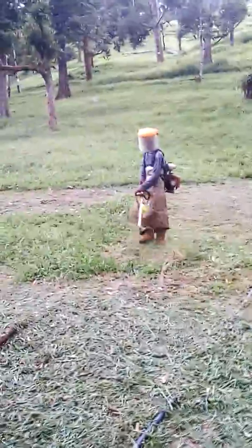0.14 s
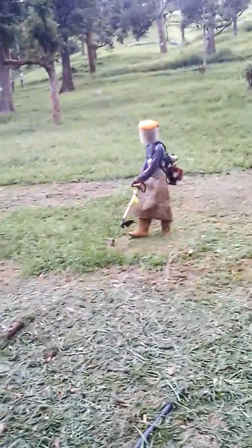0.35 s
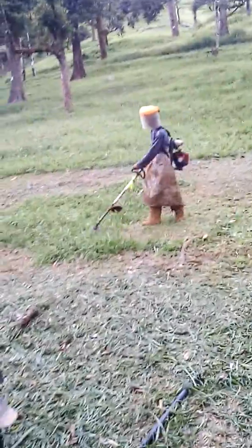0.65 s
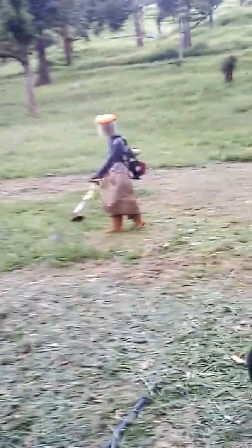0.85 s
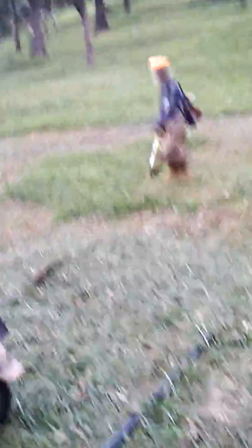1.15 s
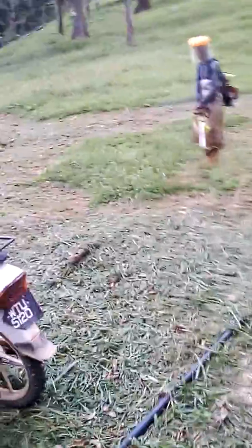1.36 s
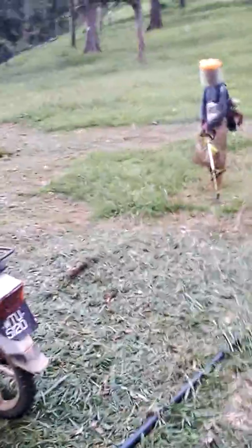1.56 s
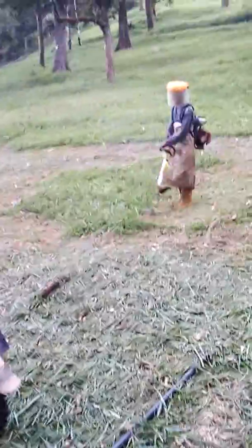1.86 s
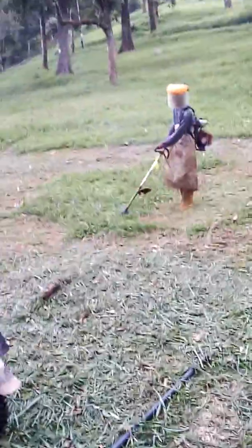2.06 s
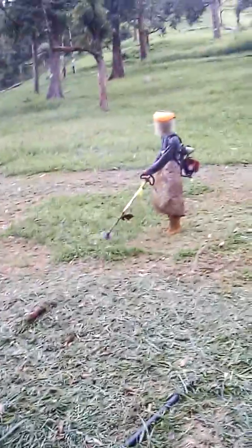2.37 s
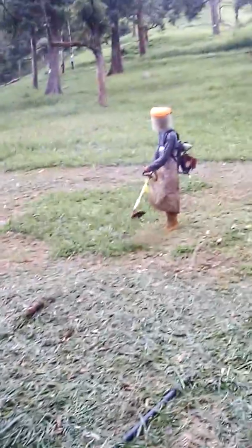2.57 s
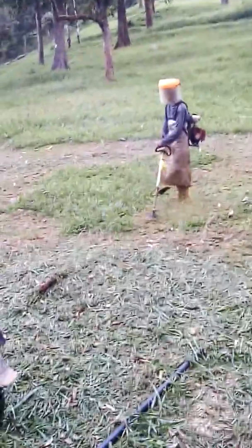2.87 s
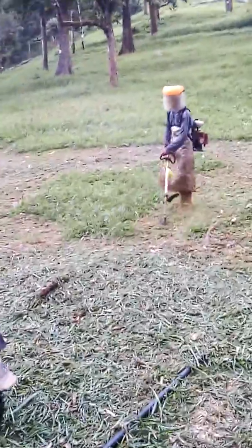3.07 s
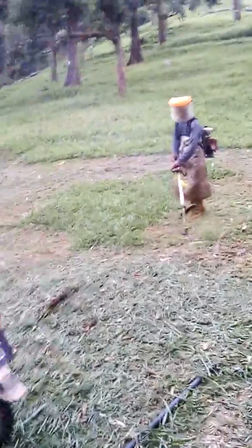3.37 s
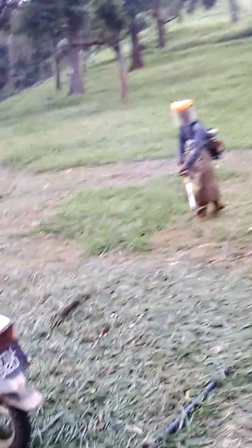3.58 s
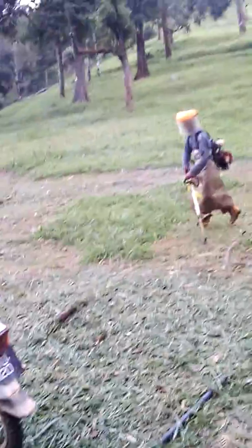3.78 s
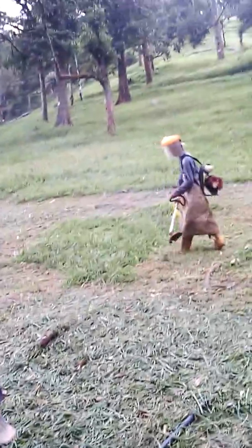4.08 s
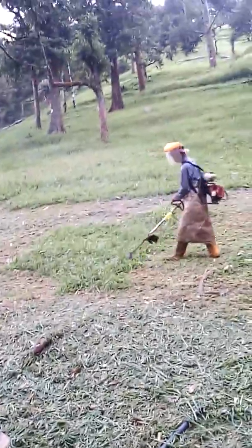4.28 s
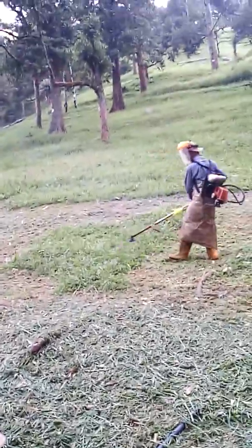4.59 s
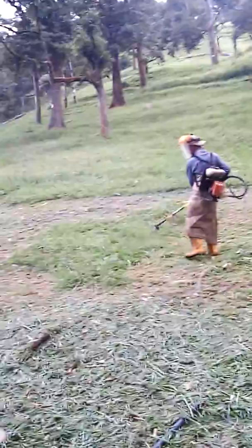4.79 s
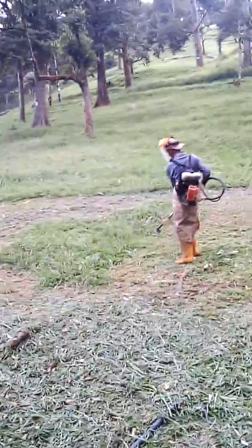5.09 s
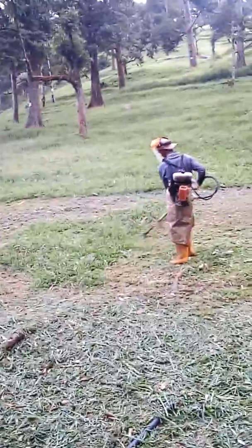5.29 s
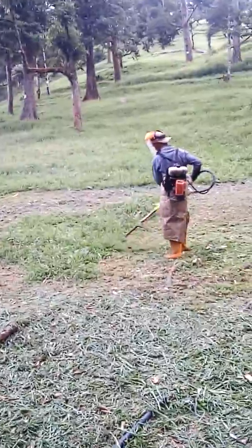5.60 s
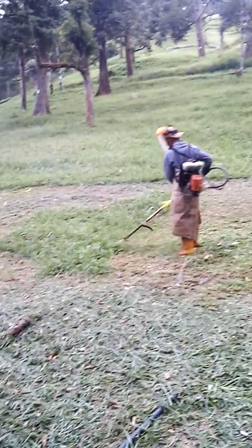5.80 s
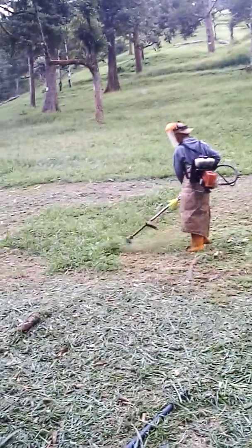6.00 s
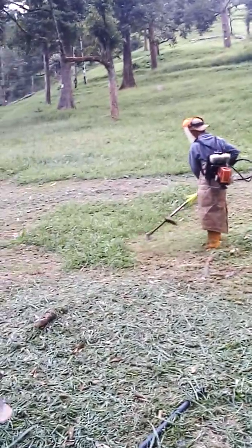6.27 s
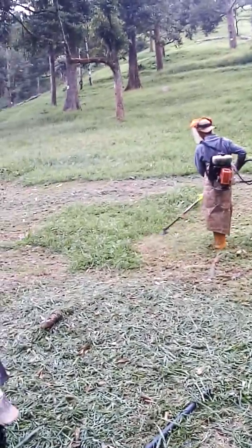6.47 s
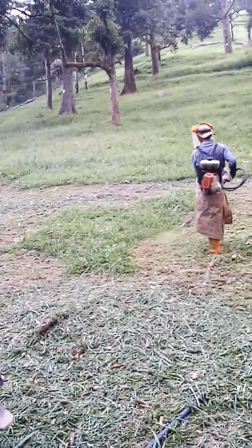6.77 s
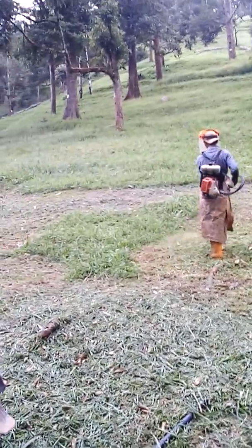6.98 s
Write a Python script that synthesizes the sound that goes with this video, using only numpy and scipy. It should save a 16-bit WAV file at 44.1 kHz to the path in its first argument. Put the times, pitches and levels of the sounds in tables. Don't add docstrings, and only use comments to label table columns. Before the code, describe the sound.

A small two-stroke brush cutter drones steadily outdoors while its spinning line swishes, slaps grass stalks and cracks sharply on stems and soil.

```python
import sys
import numpy as np
from scipy import signal
from scipy.fft import rfft, irfft
from scipy.io import wavfile
from scipy.ndimage import uniform_filter1d, map_coordinates

SR = 44100
rng = np.random.default_rng(int(sys.argv[2]) if len(sys.argv) > 2 else 0)


def undo_db(level):
    steps = np.asarray(level, float) / 20
    return 10 ** steps


def master(y):
    cut = np.clip(np.atleast_2d(y).T, -1, 1)
    pcm = np.round(cut * 32767)
    wavfile.write(sys.argv[1], SR, pcm.astype(np.int16))


N = 314874


def unit(x):
    return x / np.sqrt(np.mean(x ** 2) + 1e-20)


def curves(rows):
    s, *cols = np.transpose(rows)
    return [np.interp(np.arange(N) / SR, s, c) for c in cols]


def wobble(rate_hz, count=1):
    knots = rng.standard_normal(int(N * rate_hz / SR) + 4)
    return map_coordinates(knots, [np.arange(0, N, count) * rate_hz / SR])


def coloured(x, spectrum):
    hz, db = np.transpose(spectrum)
    size = 4096
    bins_hz = np.fft.rfftfreq(size, 1 / SR)
    gain = undo_db(np.interp(np.log(bins_hz + 1), np.log(hz), db))
    cepstrum = irfft(np.log(gain + 1e-5))
    cepstrum[1:size // 2] *= 2
    cepstrum[size // 2 + 1:] = 0
    return signal.oaconvolve(x, irfft(np.exp(rfft(cepstrum))))[:N]


def patchy(patchy_db):
    z = signal.stft(rng.standard_normal(N), nperseg=512)[2]
    field = uniform_filter1d(rng.standard_normal(z.shape), 5, 0)
    field = uniform_filter1d(field, 20, 1)
    return unit(signal.istft(z * undo_db(patchy_db * unit(field)), nperseg=512)[1][:N])


def burst(sizes, decay_s):
    shape = np.exp(-np.arange(SR // 100) / SR / decay_s)
    puff = signal.oaconvolve(abs(sizes), shape)[:N] * rng.standard_normal(N)
    return sizes + 0.45 * puff


def knocks(at, sizes, hz, decay_s):
    t = np.arange(SR // 100) / SR
    envelope = t / decay_s * np.exp(1 - t / decay_s)
    tones = sizes[:, None] * np.sin(2 * np.pi * hz[:, None] * t) * envelope
    places = at[:, None] + np.arange(len(t))
    return np.bincount(places.ravel(), tones.ravel(), N + len(t))[:N]


# start_s, side (0 hidden, 1 side-on, 2 facing
BACKPACK_TURN = [
    (0, 0),
    (.9, 0.12),
    (1.8, 1),
    (4.35, 1.3),
    (4.8, 2.4),
    (7.14, 2.8),
]


def backpack_turn():
    return curves(BACKPACK_TURN)[0]


def turned(x, spectra):
    turn = np.clip(backpack_turn(), 0, len(spectra) - 1)
    sound = 0
    for i, side in enumerate(spectra):
        share = np.clip(1 - abs(turn - i), 0, 1)
        sound = sound + np.sqrt(share) * unit(coloured(x, side))
    return sound


# start_s, lag_ms, cutter_strength_0_to_1
GROUND_ECHO = [(0, 0.55, 0.25), (.45, 0.58, 0.1), (.65, 0.62, 0.2), (.9, 0.67, 0.14), (1.2, 1.03, 0.04),
               (1.45, 1.02, 0.03), (1.7, 1.08, 0.06), (2.1, 1.3, 0.13), (4, 1.22, 0.12), (7.14, 1.19, 0)]


def grounded(x, strength):
    lag_ms = uniform_filter1d(curves(GROUND_ECHO)[0], SR // 10)
    copy = map_coordinates(x, [np.arange(N) - lag_ms * SR / 1000], order=2)
    return (x + strength * copy) / np.sqrt(1 + strength ** 2)


# start_s, level_db
EXHAUST_LEVEL = [(0.0, -38), (1.19, -32.5), (1.81, -35), (3.7, -35.5), (4.34, -33), (4.55, -34.5),
                 (4.73, -31.5), (5.55, -34), (7.14, -33)]
# start_s, firings_hz
FIRING_RATE = [(0.0, 88.1), (1.79, 88.0), (2.48, 88.3), (3.02, 87.9), (3.32, 88.6), (3.5, 87.6),
               (4.06, 87.5), (4.34, 92.6), (4.57, 94.9), (4.71, 95.3), (5.09, 89.5), (5.31, 88.2),
               (7.08, 88.2), (7.14, 87.7)]
# multiple_of_firing_rate, level_db
OVERTONES_HIDDEN = [(1, -23.5), (2, -20), (3, -20.5), (4, -17.5), (5, -19.5), (6, -7.5), (7, -36), (8, -52),
                    (9, -1), (10, 6.5), (11, 1.5), (12, 1.5), (13, -15), (14, -7), (15, -26), (16, -18),
                    (17, -10), (18, -8), (19, -33), (20, -15)]
OVERTONES_SIDE_ON = [(1, -25), (2, -22.5), (3, -20.5), (4, -42), (5, -24), (6, -17.5), (7, -39), (8, -5.5),
                     (9, -2.5), (10, 4.5), (11, -3), (12, -5), (13, -30), (14, -12.5), (15, -16), (16, -40),
                     (17, -45), (18, -12), (19, -21), (20, -11), (21, -24), (22, -30), (23, -15), (24, -19),
                     (25, -18), (26, -17), (27, -14), (28, -29), (29, -21), (30, -32)]
OVERTONES_FACING = [(1, -24.5), (2, -22.5), (3, -18.5), (4, -47), (5, -22.5), (6, -9.5), (7, -3), (8, -9.5),
                    (9, -2), (10, 5), (11, -8.5), (12, -6.5), (13, -16.5), (14, -53), (15, -19),
                    (16, -11.5), (17, -10.5), (18, -25), (19, -7.5), (20, -28), (21, -32), (22, -36),
                    (23, -44), (24, -13), (25, -19), (26, -36), (27, -8), (28, -9), (29, -13), (30, -21)]
# pitch_hz, width_hz, level_db
FIN_RESONANCE = (4850, 110, -14.5)
# freq_hz, level_db_per_hz
CASING_SPECTRUM = [(40, -40), (70, -44), (100, -29), (300, -11), (500, -8), (900, -2), (1200, -4.5),
                   (1600, -9.5), (2400, -6), (4000, -12.5), (8000, -73)]


def engine():
    level_db, = curves(EXHAUST_LEVEL)
    rate_hz, = curves(FIRING_RATE)
    over_hz = rate_hz - np.median(rate_hz)
    cycles = np.cumsum(rate_hz * (1 + 0.0011 * wobble(25))) / SR
    note = exhaust_note(cycles, rate_hz, over_hz)
    gate = 1 + .5 * np.cos(2 * np.pi * cycles)
    casing = unit(coloured(gate * patchy(patchy_db=-2), CASING_SPECTRUM))
    casing_db = -42 - 0.46 * over_hz + 3 * np.clip(backpack_turn() - 2, 0, 1)
    return undo_db(level_db + 1.0) * note + undo_db(casing_db) * grounded(casing, 0.39)


def exhaust_note(cycles, rate_hz, over_hz):
    race_hz, fill_db = 5, -17
    step = 64
    coarse = np.arange(0, N, step)
    turn, rate, over = backpack_turn()[coarse], rate_hz[coarse], over_hz[coarse]
    angle = (2 * np.pi * (cycles % 1)).astype(np.float32)
    fin_hz, fin_width_hz, fin_db = FIN_RESONANCE
    note, power = np.zeros(N), 0
    for k in (*range(1, 32), *range(51, 60)):
        place = k * (rate / np.median(rate_hz)) ** (k > 13)
        gain = 0
        for i, side in enumerate((OVERTONES_HIDDEN, OVERTONES_SIDE_ON, OVERTONES_FACING)):
            side_db = np.interp(place, *np.transpose(side), right=-45)
            gain = gain + np.clip(1 - abs(turn - i), 0, 1) * undo_db(side_db)
        fins = undo_db(fin_db) / (1 + ((k * rate - fin_hz) / fin_width_hz) ** 2)
        gain = gain + np.clip(turn - 1, 0, 1) * fins
        fill = (4 < k < 15) * undo_db(fill_db) * np.clip(over / race_hz, 0, 1)
        gain = np.maximum(gain, fill)
        power = power + gain ** 2 / 2
        gain = gain * undo_db(wobble(4.6, count=step))
        lag = 1.51 * np.arctan((k - 10) / 0.5)
        note += np.interp(np.arange(N), coarse, gain) * np.cos(k * angle - np.float32(lag))
    return note / np.interp(np.arange(N), coarse, np.sqrt(power))


# start_s, turns_hz
HEAD_SPEED = [(0.0, 52.31), (0.24, 62.31), (1.18, 64.14), (1.28, 53.48), (1.52, 51.5), (1.96, 61.72),
              (2.28, 56.22), (2.52, 66.56), (2.8, 59.09), (3.32, 67.06), (3.78, 57.96), (4.48, 72.99),
              (5.18, 67.66), (5.38, 60.4), (5.76, 59.93), (6.14, 50.96), (6.36, 58.6), (7.14, 67.85)]


def head_turns():
    return np.cumsum(curves(HEAD_SPEED)[0]) / SR - .04


def line_hum(turns):
    level = undo_db(-62.5 + 2.7 * wobble(4.02))
    return level * (np.cos(4 * np.pi * turns) + 0.17 * np.cos(8 * np.pi * turns))


def line_swish(passes, luck, end_db):
    swell = undo_db(3.24 * luck[:, 0] + 0.79 * end_db) * np.exp(-2.5 * (passes % 1))
    return unit(1.73 + unit(swell)) * undo_db(0.27 * wobble(12))


def stalk_slaps(starts, luck, end_db, lopsided_db):
    run_db, scatter_db = 2.5, 3.5
    stem_hidden_hz, stem_hz = 2180, 3040
    late = (.0004 * SR * luck[:, 1]).astype(int)
    at = np.clip(starts + late, 0, N - 1)
    scatter = np.clip(luck[:, 2], -3, .8)
    sizes = undo_db(run_db * wobble(7)[starts] + scatter_db * scatter + end_db)
    sizes = sizes / np.cosh(lopsided_db / 15) ** .5
    gap_s = abs(at[:, None] / SR - np.transpose(HARD_STRIKES)[0]).min(axis=1)
    sizes = sizes * (gap_s > .005)
    blows = np.zeros(N)
    blows[at] = sizes
    slaps = burst(blows, decay_s=0.0013)
    pitch_hz = np.interp(backpack_turn()[at], [0, .3], [stem_hidden_hz, stem_hz])
    pitch_hz = pitch_hz * np.exp(0.24 * luck[:, 3])
    return slaps, knocks(at, sizes, pitch_hz, decay_s=0.00024)


# start_s, swish_db, depth_db (slap over swish)
CUTTING = [(0.1, -26.5, -10.5), (.34, -22.5, -9), (.43, -23.5, -11), (.67, -21, -10), (.79, -22, -14.5),
           (1.09, -21.5, -7), (1.41, -30.5, -6.5), (2.09, -24, -9), (2.46, -22, -10.5), (2.88, -25, -8.5),
           (3.28, -25, -8), (3.98, -27.5, -6), (4.1, -27, -13.5), (4.61, -20, -20), (5.06, -17.5, -14),
           (5.37, -23, -11.5), (6.7, -24, -10.5), (7.14, -26.5, -18)]
# start_s, first_over_second_db
END_IMBALANCE = [(0, 12), (1, 9), (4.05, 10.5), (4.25, 4.5), (4.85, -14.5), (5, 7), (5.6, 9), (6.3, 6.5),
                 (7.14, 10)]
# freq_hz, level_db_per_hz
SWISH_SPECTRA = [
    [(2060, -46.5), (3500, -20.5), (3710, -20), (4090, -4.5), (4400, -4), (5390, 4.5), (5880, 4.5),
     (7000, -27), (9100, -59), (15400, -120)],
    [(2060, -37), (3500, -23.5), (3990, -6.5), (4430, -10.5), (5390, 5.5), (5580, -0.5), (5990, -0.5),
     (7000, -18), (9100, -35), (15400, -120)],
    [(2060, -39), (3500, -15.5), (4470, -8), (4600, -7), (5120, 2.5), (5450, -1.5), (6200, -0.5),
     (7000, -17.5), (9100, -42.5), (15400, -120)],
]
STALK_SPECTRA = [
    [(680, -33), (1150, -20), (1560, -17), (2090, -18), (2360, -23), (2840, -20.5), (3730, -10.5),
     (4600, -7.5), (5980, -39), (10100, -120)],
    [(680, -52), (1150, -10), (1480, -16.5), (1630, -6), (1900, -14), (2440, -5), (2780, -5), (4600, 0),
     (5980, -19.5), (10100, -120)],
    [(680, -48), (1150, -4), (1240, -21), (1640, -9), (2000, -12.5), (2370, -7.5), (3010, -4.5),
     (4600, -2.5), (5980, -7), (10100, -120)],
]
# freq_hz, level_db_per_hz
GRIT_SPECTRUM = [(4000, -68.5), (5000, -14), (6400, 10.5), (7000, 4), (7600, -1), (8200, -11),
                 (9000, -18.5), (10500, -21), (12500, -30.5), (15500, -45), (20000, -24)]


def cutter():
    swish_db, depth_db = curves(CUTTING)
    slap_db = swish_db + depth_db
    hidden = np.clip(1 - backpack_turn() / 0.1, 0, 1)
    grit_db = swish_db - 10.5 - 8 * hidden
    bite = .45 + 0.05 * (depth_db + 10)
    lopsided_db, = curves(END_IMBALANCE)
    turns = head_turns()
    passes = 2 * turns - .46
    index = np.clip(passes, 0, None).astype(int)
    luck = rng.standard_normal((index[-1] + 2, 4))
    end_db = lopsided_db * (.5 - index % 2)
    air = line_swish(passes, luck[index], end_db)
    starts = np.flatnonzero(np.diff(index)) + 1
    slaps, stems = stalk_slaps(starts, luck[index[starts]], end_db[starts], lopsided_db[starts])
    layers = (
        (SWISH_SPECTRA, swish_db, .25, slaps),
        (STALK_SPECTRA, slap_db, 1, slaps + 0.32 * stems),
        ([GRIT_SPECTRUM], grit_db, .9, slaps))
    sound = line_hum(turns)
    for spectra, level_db, share, hits in layers:
        hard = np.clip(share * bite, 0, 1)
        steady = turned(air * patchy(patchy_db=0.5), spectra)
        mixed = np.sqrt(1 - hard) * steady + np.sqrt(hard) * turned(hits, spectra)
        sound = sound + undo_db(level_db) * mixed
    return sound


# start_s, peak_db, slap_relative_db, slap_pitch_hz
HARD_STRIKES = [(0.0428, -8, -22, 4170), (0.517, -4.5, -23, 4170), (0.649, 2, -28, 4040),
                (0.662, -4, -20, 3880), (1.054, -5, -14, 4230), (1.1, -3.5, -12, 4000),
                (1.1313, -2.5, -14, 4260), (1.1792, -1, -13, 4160), (1.2128, -6, -9.5, 3770),
                (1.2312, -5, -13, 3840), (1.266, -10, -9, 3740), (1.283, -5, -11, 4200),
                (1.3793, -5.5, -11.5, 4080), (1.718, -8, -12, 3920), (2.1036, -5, -24, 4260),
                (2.1219, -5.5, -26, 3970), (2.2937, -2, -28, 3980), (2.6276, -1, -18, 3900),
                (2.6918, -2.5, -18, 3260), (2.7252, -.5, -18, 3660), (2.9073, -6.5, -10, 3900),
                (3.037, -3, -15, 4100), (3.0699, -5, -17, 4220), (3.2695, -4, -18, 4040),
                (3.4207, -3.5, -14, 3820), (3.5796, -7, -14, 4200), (5.0067, -6, -20, 4180),
                (5.9198, -5, -27, 4130), (6.1624, -7, -25, 4040), (6.1823, -7, -28, 4220)]


def strikes():
    s, peak_db, slap_db, pitch_hz = np.transpose(HARD_STRIKES)
    at = (s * SR).astype(int) + 20
    blows = np.zeros(N)
    blows[at] = undo_db(peak_db)
    crack = blows + .3 * (burst(blows, decay_s=.0008) - blows)
    sound = knocks(at, undo_db(peak_db + slap_db + 10), pitch_hz, decay_s=0.00026)
    for spectrum, level_db in ((SWISH_SPECTRA[1], -3), (GRIT_SPECTRUM, -18)):
        peak = abs(coloured(signal.unit_impulse(SR // 20), spectrum)).max()
        sound = sound + undo_db(level_db) * coloured(crack, spectrum) / peak
    return sound


# freq_hz, level_db_per_hz
HISS_SPECTRUM = [(60, -29), (100, 1), (8000, -4), (12000, 3), (16000, -4)]


def faint_hiss():
    return undo_db(-66) * unit(coloured(rng.standard_normal(N), HISS_SPECTRUM))


def scene():
    cutting = grounded(cutter(), curves(GROUND_ECHO)[1])
    return (engine() + cutting + strikes() + faint_hiss())[None]


def roll_off(x):
    return signal.sosfilt(signal.butter(12, 15830, fs=SR, output="sos"), x)


def record(dry):
    mix = dry / (1 + abs(dry) ** 12) ** (1 / 12)
    return roll_off(mix)


dry = scene()
out = record(dry)
master(out)
```